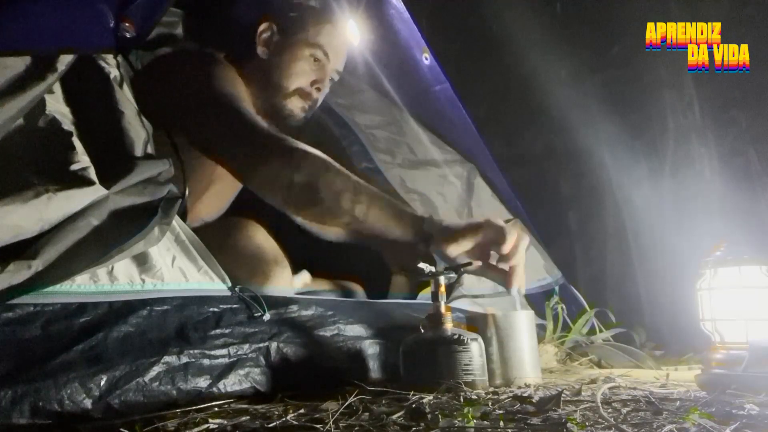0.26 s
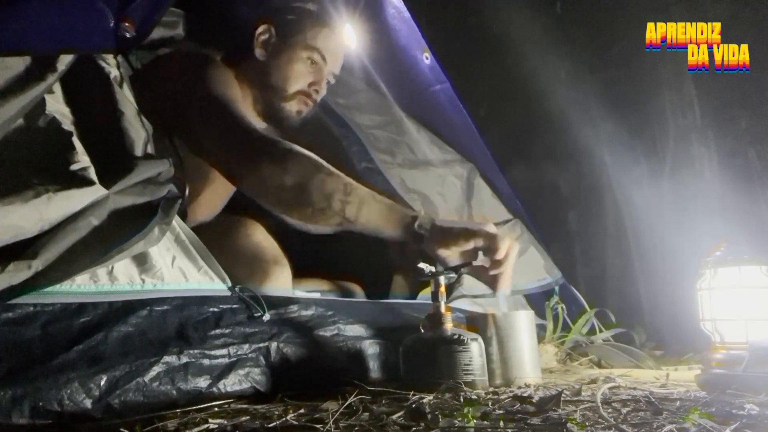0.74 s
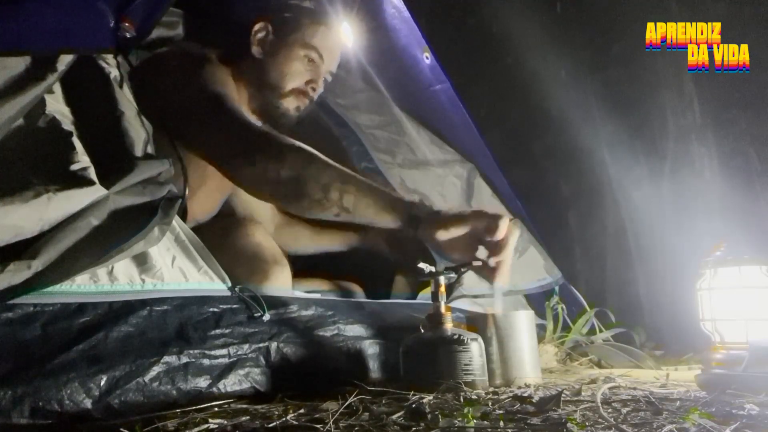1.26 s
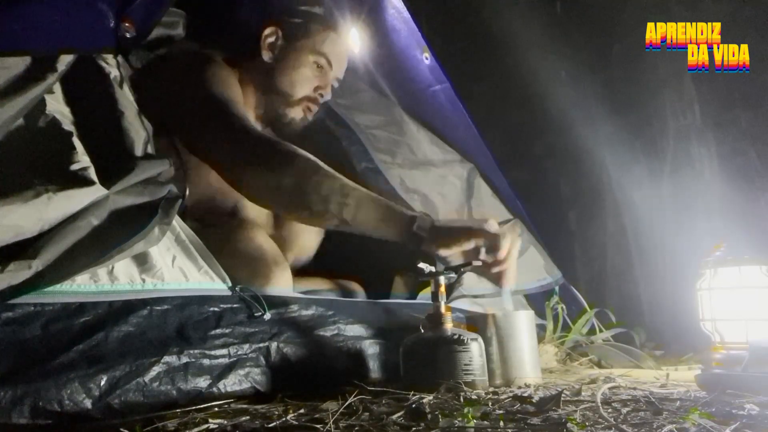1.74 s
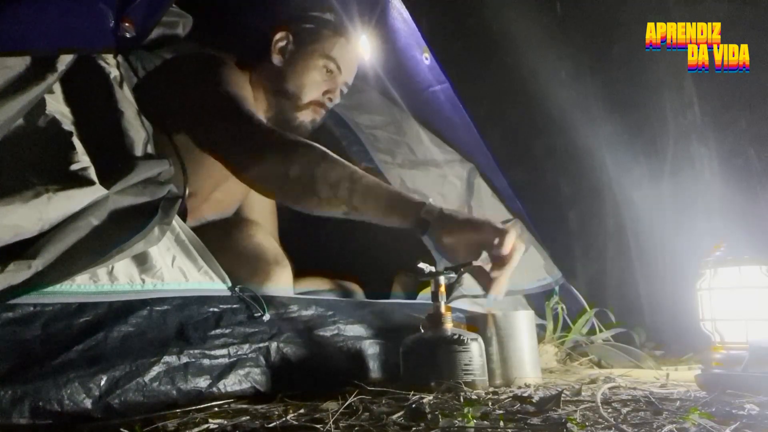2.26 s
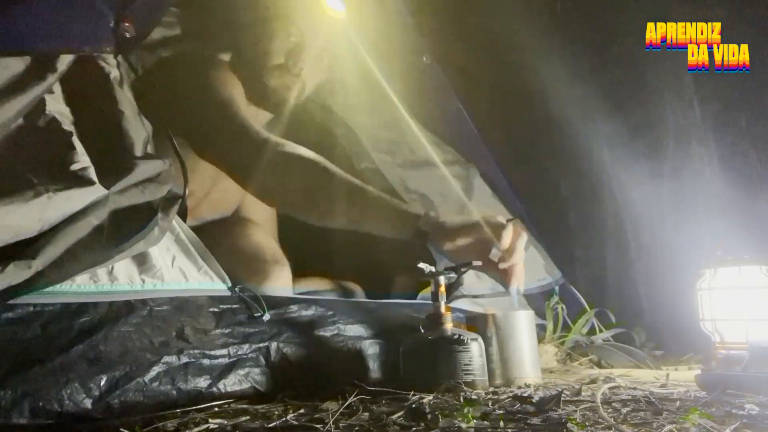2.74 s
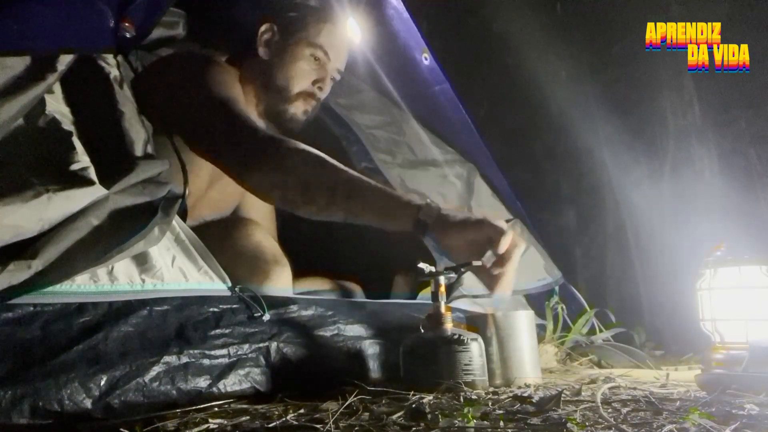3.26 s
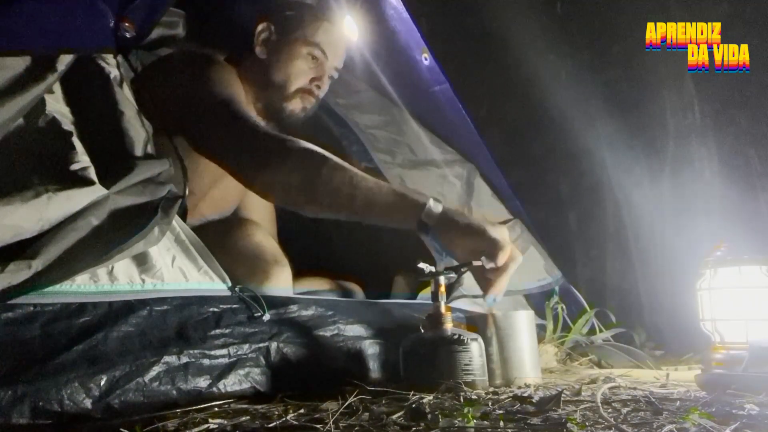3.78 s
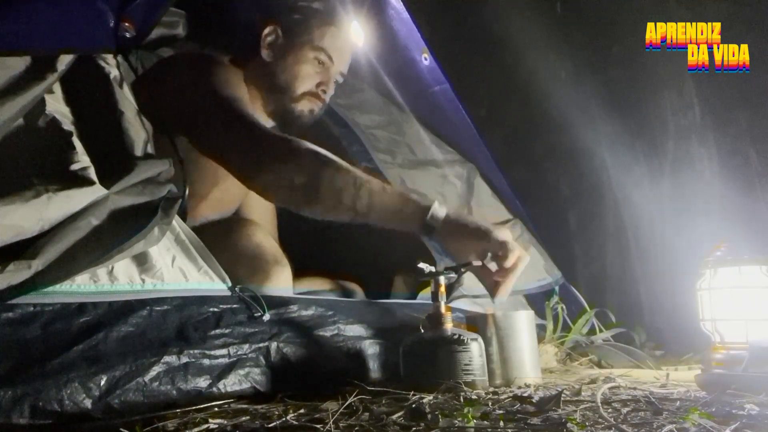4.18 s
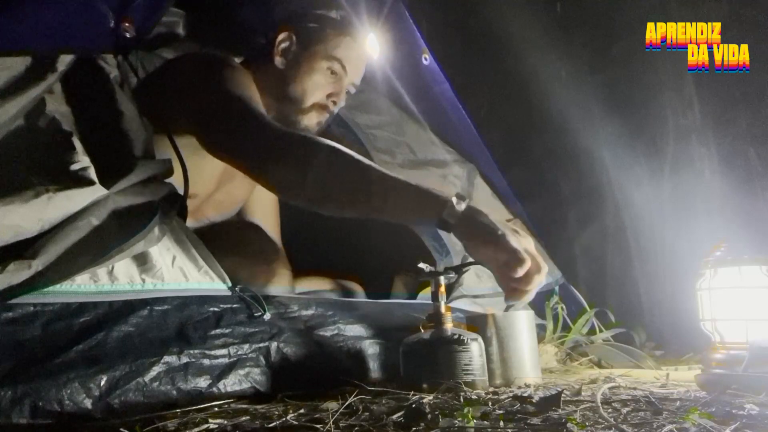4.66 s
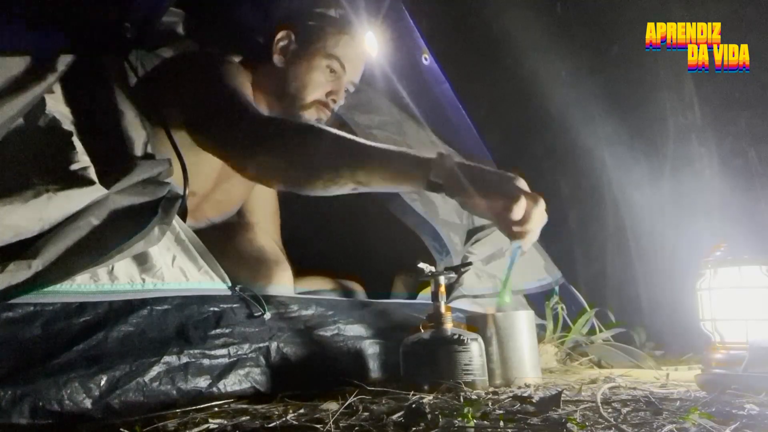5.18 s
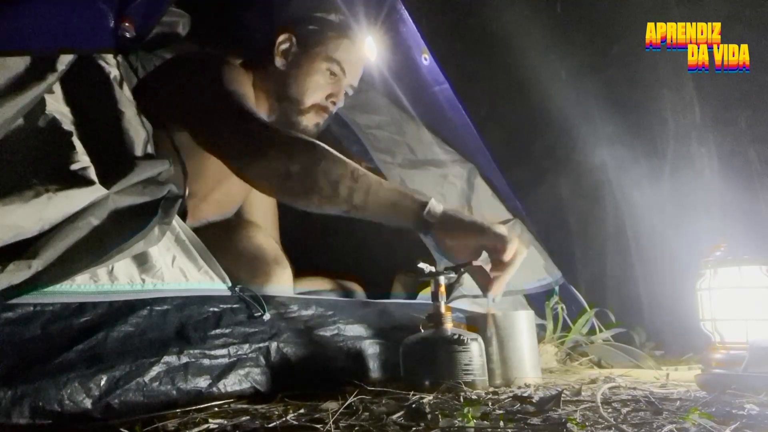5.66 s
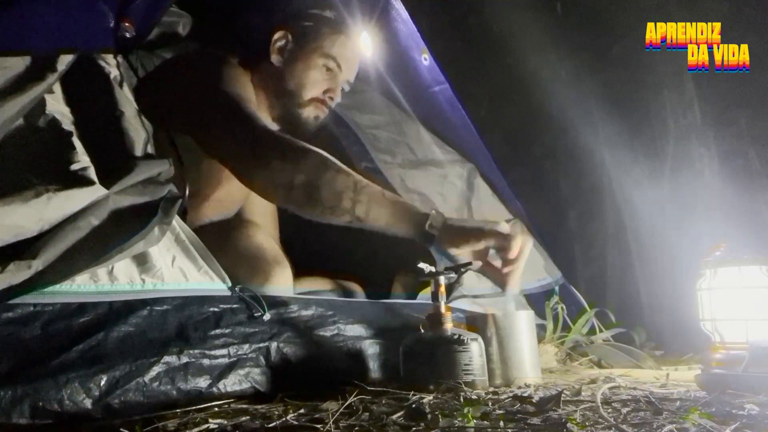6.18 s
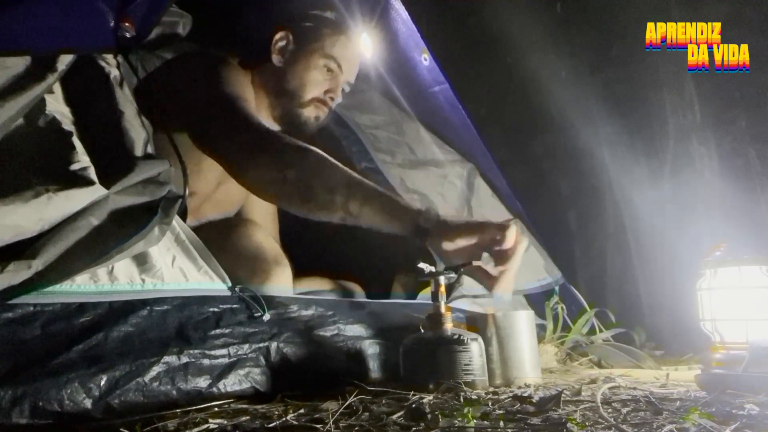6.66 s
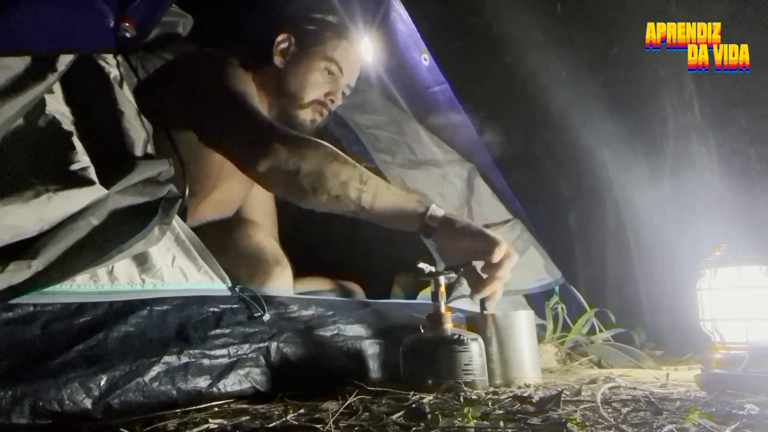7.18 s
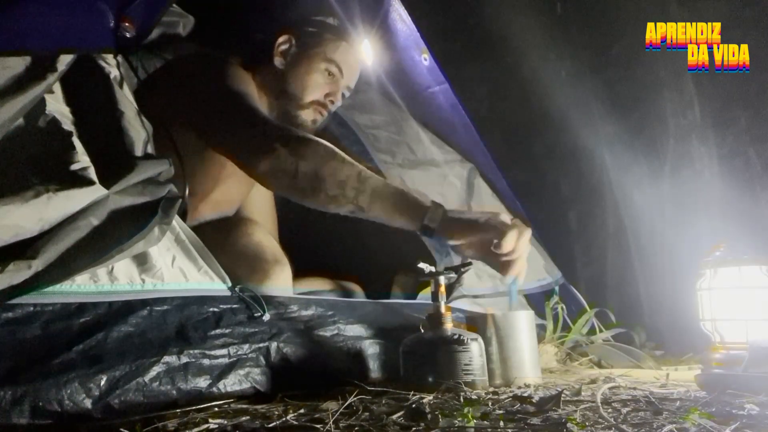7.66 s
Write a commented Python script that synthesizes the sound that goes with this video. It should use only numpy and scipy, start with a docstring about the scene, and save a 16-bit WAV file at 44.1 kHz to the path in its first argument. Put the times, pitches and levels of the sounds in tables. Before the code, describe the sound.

A fluttering low burner roar dominates, dry and close, in open air without echo. First, nylon-like tent cloth crackles in little bursts; after a short pause come even, grainy stirring swishes in a metal cup, with light taps. A small slosh, two minute sizzles and late ticks follow. Thin high insect tones and a fast, faint rasping chirp continue in the distance. Mono sound.

```python
"""A low, fluttering roar and a soft hiss: a gas canister stove burns at a tent door at night.
Close by, tent fabric crinkles in bursts of tiny snaps as someone leans out. A metal cup is stirred with
grainy noise swishes and light ticks, and sizzles twice. Farther off, choruses of crickets whine as narrow
bands of noise, two nearer insects sing thin tones, and a bush cricket rasps about six times a second.
The stove is shaped noise, over a faint hum of two unsteady tones."""
import sys
import numpy as np
from scipy import signal
from scipy.fft import rfft, irfft, next_fast_len
from scipy.io import wavfile
from scipy.ndimage import uniform_filter1d, map_coordinates

SR = 44100
rng = np.random.default_rng(int(sys.argv[2]) if len(sys.argv) > 2 else 0)


def wrap_up_sound(samples):
    """Save the sound to the file named by the first command line argument, as 16-bit audio."""
    columns = np.atleast_2d(samples).T
    # keep every value between -1 and 1, then stretch to whole-number steps
    tamed = np.clip(columns, -1, 1)
    steps = np.round(tamed * 32767).astype(np.int16)
    wavfile.write(sys.argv[1], SR, steps)


N = 349272

# Faint hum, two tones: (pitch [Hz], level [dB])
HUM_TONES = [(216, -1.8), (335, -1.9)]
# Swells added to the steady hum: (time [s], half length to 1/e [s], level [dB])
HUM_SWELLS = [(1.2, 0.36, -50.5), (2.3, 0.19, -40.5)]
HUM_DB = -53  # the steady part

# Far cricket choruses: (pitch [Hz], spread of pitch [Hz], level [dB], wing strokes [per s])
CRICKET_CHORUSES = [(3003, 46, -65, 48), (2932, 97, -66.5, 40), (5464, 107, -66.5, 99),
                    (6205, 146, -59, 75), (6357, 62, -63.5, 31), (8980, 100, -78.5, 39),
                    (11900, 260, -88.5, 75)]
# A nearer insect whose whine wavers up and down
WAVER_HZ, WAVER_SWING_HZ, WAVER_DB = 6310, 135.3, -64.5
WAVER_PERIOD_S, WAVER_CREST_S = .357, .29  # the crest is the first highest pitch
# A group that trills and rests by turns
BOUT_PERIOD_S, BOUT_MIDDLE_S = 1.816, 1.43  # middle of a trilling bout
BOUT_DB, REST_DB = -68.5, -79.5
# The bush cricket: a nearly even beat, and the middle of the first chirp
CHIRPS_PER_S, FIRST_CHIRP_S = 5.88, .136
CHIRP_DB, CHIRP_EDGE = -72, 1.9  # the edge sets how abruptly a chirp starts and stops

# Large folds of tent fabric that buckle: (time [s], time scale [s], crackle level [dB], brightness [dB])
LARGE_FOLDS = [(0.086, .008, -52.5, -2), (0.146, 0.0095, -45.5, -0.5), (0.248, 0.0066, -39.5, -2),
               (0.349, 0.0022, -49, -5.5), (0.569, 0.011, -46, 0.5), (0.76, .022, -56.5, 6),
               (0.796, 0.0096, -48.5, -0.5), (0.869, 0.014, -46, 1.5), (1.091, 0.0083, -54, 3),
               (1.139, .009, -52, 4.5), (1.191, .002, -51, 6), (1.275, .022, -55.5, 7),
               (1.298, 0.0069, -40.5, 5.5), (1.327, 0.0018, -43.5, -10.5), (1.338, 0.0089, -40, 0.5),
               (1.847, 0.0022, -45, -2.5), (1.993, 0.019, -57, 4)]
# Spectra of the flap of the sheet, the crackle of the fold and its fizz: (frequency [Hz], level [dB])
FLAP_SPECTRUM = [(120, -10), (260, 5.5), (400, -4), (620, -6), (950, -4), (1250, -9.5), (1800, -21),
                 (3000, -60)]
CRACKLE_SPECTRUM = [(900, -12), (1800, -5), (2500, -1), (3500, 4), (4500, 3.5), (6000, -1.5), (7500, -10),
                    (11000, -34)]
FIZZ_SPECTRUM = [(4000, -23), (6000, 2.5), (7500, -2.5), (10000, -7), (14000, -7), (16000, -14)]
FLAP_DB, FIZZ_DB = 11, -8  # over the crackle; a brighter fold has less flap and more fizz
# Small folds give way at random while the fabric moves: about until, typical time scale, typical level
MOVING_S, SMALL_SCALE_S, SMALL_DB = 1.3, .005, -58.5
SMALL_SCATTER_DB, SMALL_BRIGHT_DB = 2, 3
# The fabric slides, eases off and comes to rest: (time [s], level [dB])
SLIDE_LEVEL = [(0, -51.5), (0.5, -64), (1.36, -64), (1.42, -90)]
# Spectrum of the sliding cloth: (frequency [Hz], level [dB])
RUB_SPECTRUM = [(600, -1), (1100, 7.5), (1600, -3), (2400, -10), (3500, -3), (4700, -2.5), (7000, -8.5),
                (10000, -18), (15000, -25)]

# Brief, very bright sizzles at the hot cup: (time [s], time constant [s], level [dB])
SIZZLES = [(5.111, 0.0034, -50.5), (7.478, .007, -58)]
# Spectrum of a sizzle: (frequency [Hz], level [dB])
SIZZLE_SPECTRUM = [(2500, -17), (5000, 6), (8000, -7), (10000, -10), (12000, -4), (14000, 0), (16000, -5)]
# Light ticks of the spoon in the cup: (time [s], level [dB])
TICKS = [(1.754, -50), (1.793, -49), (2.537, -47), (5.33, -63), (7.251, -58), (7.29, -53), (7.348, -56.5),
         (7.633, -52)]
TICK_RISE_S, TICK_FALL_S = .001, .004  # time constants
# Spectrum of a tick: (frequency [Hz], level [dB])
TICK_SPECTRUM = [(300, 4), (900, 11), (1800, -2), (4500, -2), (7500, -3), (11000, -9), (15500, -10)]
# Runs of even stirring: (first turn [s], last turn [s], turns [count], first level [dB],
# last level [dB], half length of a swish, to 1/e of its power [s])
STIRRING_RUNS = [(1.77, 2.255, 3, -61, -54, .036), (2.635, 4.31, 7, -55.5, -63, 0.045),
                 (6.05, 6.05, 1, -66.5, -66.5, 0.11)]
# Spectrum of a swish: (frequency [Hz], level [dB])
SWISH_SPECTRUM = [(500, -31), (900, 14.5), (1500, 0), (2300, 4.5), (3500, 0.5), (5000, -0.5), (7000, -10.5),
                  (10000, -22.5), (15000, -32)]

# Spectra of the burner's roar, flame body and gas hiss: (frequency [Hz], level [dB])
ROAR_SPECTRUM = [(20, -29), (33, -23), (50, -10.5), (65, -1.5), (85, 0), (120, -4.5), (170, -9), (260, -28),
                 (500, -80)]
BODY_SPECTRUM = [(90, -18), (160, -5.5), (215, 0), (280, -4), (340, -7.5), (420, -10.5), (560, -18),
                 (800, -24), (1500, -60)]
HISS_SPECTRUM = [(250, -23), (550, -1), (800, 0.5), (1000, -3), (1400, -9.5), (2000, -14.5), (2700, -18.5),
                 (3500, -25.5), (4500, -25.5), (7000, -36), (12000, -36), (15500, -40.5)]
# The body of the flame settles a little: (time [s], level [dB])
BODY_LEVEL = [(0, -39), (2.3, -39.5), (3.2, -41.5), (5, -42), (5.8, -40), (6.6, -41.6)]
ROAR_DB, HISS_DB = -34, -53.5

TOP_HZ = 15750  # upper band limit of the microphone chain


def amp(db):
    """Decibels to gain."""
    return 10 ** (np.asarray(db) / 20)


def unit(x):
    """x scaled to rms 1."""
    return x / np.sqrt(np.mean(x ** 2) + 1e-20)


def clock():
    """The time of every sample, in seconds."""
    return np.arange(N) / SR


def curve(rows):
    """A level for every sample, in straight lines between (time, level) rows."""
    times, levels = np.transpose(rows)
    return np.interp(clock(), times, levels)


def wobble(rate):
    """A smooth random curve, rate knots a second."""
    knots = rng.standard_normal(4096)
    coarse = np.linspace(0, N / SR, 8192)
    smooth = map_coordinates(knots, [coarse * rate], mode="wrap")
    return np.interp(clock(), coarse, smooth)


def swell(s, half_s):
    """A smooth rise and fall about the time s."""
    return np.exp(-np.minimum(((clock() - s) / half_s) ** 2, 50))


def on_off(cycles, edge):
    """A soft gate between 0 and 1 that is open for half of each cycle."""
    return (1 + np.tanh(edge * np.cos(2 * np.pi * cycles))) / 2


def tone(pitch_hz):
    """A sine that follows a pitch curve."""
    return np.sin(2 * np.pi * np.cumsum(pitch_hz) / SR)


def noise():
    """White noise."""
    return rng.standard_normal(N)


def grains(rate, smooth):
    """Tiny snaps of random size, about rate a second, on a share of smooth noise."""
    snaps = (rng.random(N) < rate / SR) * noise()
    return unit(snaps) + smooth * noise()


def filtered(x, response):
    """x passed through a response given as a function of frequency."""
    m = next_fast_len(N + SR // 4)
    gains = response(np.fft.rfftfreq(m, 1 / SR))
    return irfft(rfft(x, m) * gains, m)[:N]


def coloured(x, spectrum):
    """x filtered by a (frequency, level) spectrum, at rms 1."""
    f, db = np.transpose(spectrum)

    def response(hz):
        return amp(np.interp(np.log(hz + 1), np.log(f), db, right=-120))
    return unit(filtered(x, response))


def patchy(x, depth_db):
    """The colour of x shifts at random from one instant to the next."""
    z = signal.stft(x, nperseg=256)[2]
    field = uniform_filter1d(rng.standard_normal(z.shape), size=4, axis=0)  # smooth over pitch
    field = uniform_filter1d(field, size=8, axis=1)  # smooth over time
    return signal.istft(z * amp(depth_db * unit(field)), nperseg=256)[1][:N]


def hum():
    """Two low, unsteady tones stay faint and swell up at times."""
    level = amp(HUM_DB)
    for s, half_s, db in HUM_SWELLS:
        level = level + amp(db) * swell(s, half_s)
    tones = np.zeros(N)
    for hz, db in HUM_TONES:
        pitch_hz = hz * (1 + 0.01491 * wobble(9))
        tones += amp(db + 1.24 * wobble(6)) * tone(pitch_hz)
    return level * tones


def chorus(hz, spread_hz, strokes, depth=0.23, skirt=0.022):
    """Many far insects near one pitch blur into a narrow band that flutters with their wing strokes."""
    def band(f):
        off = ((f - hz) / spread_hz) ** 2
        return np.exp(-off / 4) + skirt / (1 + off / 20)
    wings = tone(strokes * (1 + .25 * wobble(12)))
    return unit(unit(filtered(noise(), band)) * (1 + depth * wings))


def trill(pitch_hz):
    """One insect's thin tone, roughened by its wing strokes."""
    return unit((1 + 0.53 * wobble(90)) * tone(pitch_hz))


def crickets():
    """Steady far choruses, two nearer insects (one level, one wavering), and a group that trills in bouts."""
    t = clock()
    steady = np.zeros(N)
    for hz, spread_hz, db, strokes in CRICKET_CHORUSES:
        steady += amp(db + 0.38 * wobble(6.5)) * chorus(hz, spread_hz, strokes)

    near_db = -66.5 + 0.92 * wobble(5) + 1.5 * wobble(35)
    near = amp(near_db) * trill(2965 * (1 + 0.004 * wobble(25)))

    swing = np.cos(2 * np.pi * (t - WAVER_CREST_S) / WAVER_PERIOD_S) + .25 * wobble(25)
    wavering = amp(WAVER_DB + 3.7 * wobble(12)) * trill(WAVER_HZ + WAVER_SWING_HZ * swing)

    trilling = on_off((t - BOUT_MIDDLE_S) / BOUT_PERIOD_S, edge=7.1)
    bout_db = REST_DB + (BOUT_DB - REST_DB) * trilling
    group = amp(bout_db) * chorus(hz=4880, spread_hz=180, strokes=55)
    return steady + near + wavering + group


def bush_cricket():
    """Each closing of the wings drags a scraper over a file: a short, high rasp."""
    beat = (clock() - FIRST_CHIRP_S) * CHIRPS_PER_S + .02 * wobble(5)
    rasp = patchy(chorus(hz=8410, spread_hz=440, strokes=190), depth_db=1.5)
    return amp(CHIRP_DB + 1.1 * wobble(9)) * on_off(beat, CHIRP_EDGE) * unit(rasp)


def small_folds(count):
    """Rows like those of LARGE_FOLDS, scattered over the time that the fabric moves."""
    place, length, size = rng.standard_normal((count, 3)).T
    times = np.abs(np.arange(count) + 1 + .3 * place) * MOVING_S / count
    scales = SMALL_SCALE_S * np.exp(.4 * length)
    levels = SMALL_DB + SMALL_SCATTER_DB * size
    return [(s, scale, db, SMALL_BRIGHT_DB) for s, scale, db in zip(times, scales, levels)]


def fabric():
    """A fold buckles in a burst of tiny snaps while the sheet around it flaps; the cloth also slides."""
    t, power = clock(), np.zeros((3, N))
    for s, scale_s, db, bright_db in LARGE_FOLDS + small_folds(count=13):
        near = slice(max(0, int((s - .15) * SR)), int((s + .15) * SR))
        age = (t[near] - s) / scale_s
        shape = np.exp(np.minimum(1.08 * age, -.85 * age))  # the fold gives way faster than it settles
        gains = amp([db + FLAP_DB - bright_db, db, db + FIZZ_DB + bright_db])
        power[:, near] += np.outer(gains, shape) ** 2
    flap, crackle, fizz = np.sqrt(power)

    snaps = patchy(grains(rate=2500, smooth=0.96), depth_db=3.5)
    folds = flap * coloured(noise(), FLAP_SPECTRUM)
    folds += crackle * coloured(snaps, CRACKLE_SPECTRUM)
    folds += fizz * coloured(snaps, FIZZ_SPECTRUM)

    rub = coloured(patchy(grains(rate=900, smooth=1.0), depth_db=4.5), RUB_SPECTRUM)
    slide = amp(curve(SLIDE_LEVEL) + 1.6 * wobble(44.7)) * rub
    return folds + slide


def sizzles():
    """A stray drop flashes to steam on hot metal: a brief burst of bright grains."""
    t, burst = clock(), np.zeros(N)
    for s, constant_s, db in SIZZLES:
        burst += amp(db) * np.exp(-np.minimum(np.abs(t - s) / constant_s, 50))
    return burst * coloured(grains(rate=3000, smooth=.7), SIZZLE_SPECTRUM)


def ticks():
    """The spoon touches the cup: a dry tick, damped by the water."""
    t, touch = clock(), np.zeros(N)
    for s, db in TICKS:
        age = np.maximum((s - t) / TICK_RISE_S, (t - s) / TICK_FALL_S)
        touch += amp(db) * np.exp(-np.minimum(age, 50))
    return touch * coloured(noise(), TICK_SPECTRUM)


def stirring():
    """Each turn of the spoon swells into a soft, grainy swish; lowering it makes one small slosh."""
    power = np.zeros(N)
    for first_s, last_s, turns, first_db, last_db, half_s in STIRRING_RUNS:
        for s, db in np.linspace((first_s, first_db), (last_s, last_db), round(turns)):
            power += amp(db) ** 2 * swell(s, half_s)
    flutter = amp(4.6 * wobble(70))
    swishes = np.sqrt(power) * flutter * coloured(grains(rate=1500, smooth=0.98), SWISH_SPECTRUM)
    slosh = amp(-57.5) * swell(4.68, .025) * coloured(noise(), [(1200, -15), (1700, 0), (2200, -20)])
    return swishes + slosh


def burner():
    """The turbulent flame roars and flutters; the gas jet hisses more steadily above it."""
    roar = amp(ROAR_DB + 0.71 * wobble(5)) * coloured(noise(), ROAR_SPECTRUM)
    body = amp(curve(BODY_LEVEL) + 0.83 * wobble(6.7)) * coloured(noise(), BODY_SPECTRUM)
    hiss_db = HISS_DB + 0.66 * wobble(2.985) + 0.19 * wobble(20)
    hiss = amp(hiss_db) * coloured(noise(), HISS_SPECTRUM)
    return roar + body + hiss


def scene():
    """Everything in open air, with no echo, on one channel."""
    background = hum() + crickets() + bush_cricket()
    close_by = fabric() + sizzles() + ticks() + stirring()
    return (background + close_by + burner())[None]


def record(dry):
    """The microphone chain passes only what lies below its band limit."""
    return np.array([filtered(channel, lambda hz: hz < TOP_HZ) for channel in dry])


dry = scene()
out = record(dry)
wrap_up_sound(out)
```